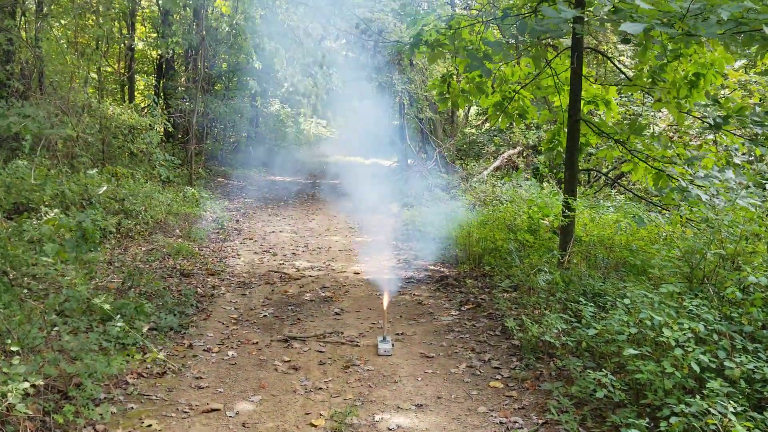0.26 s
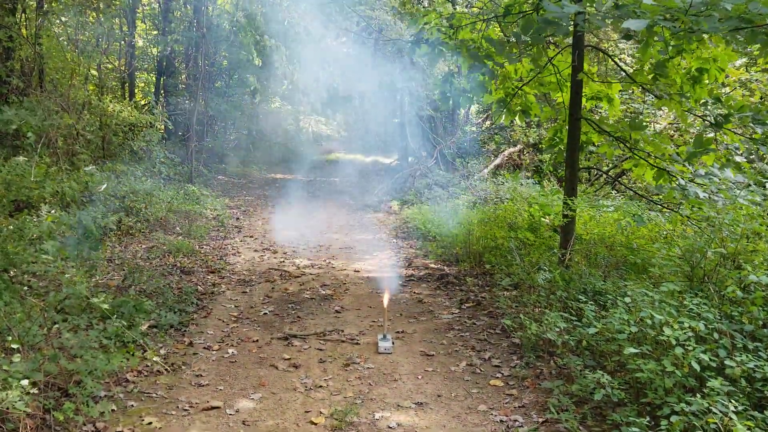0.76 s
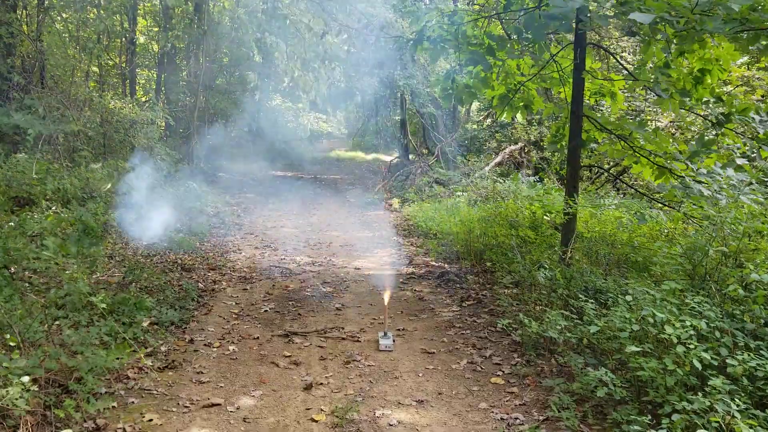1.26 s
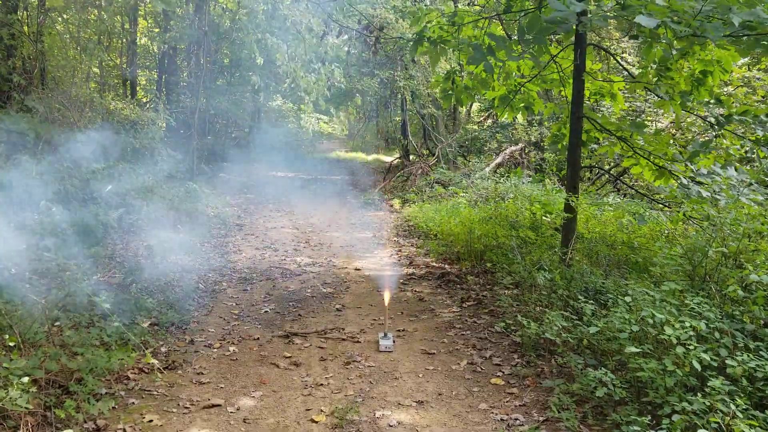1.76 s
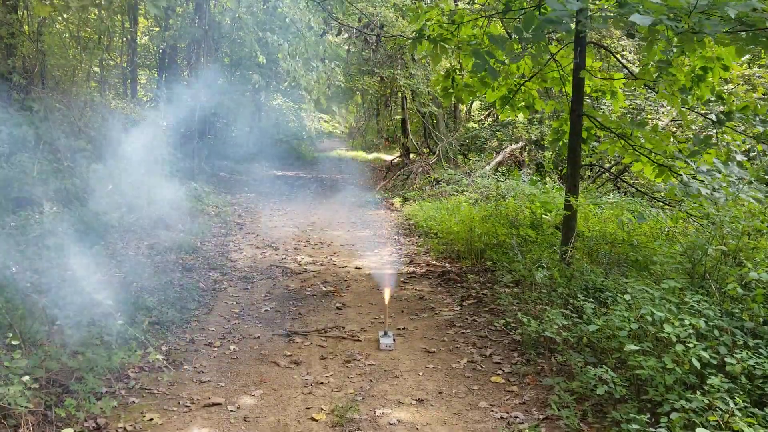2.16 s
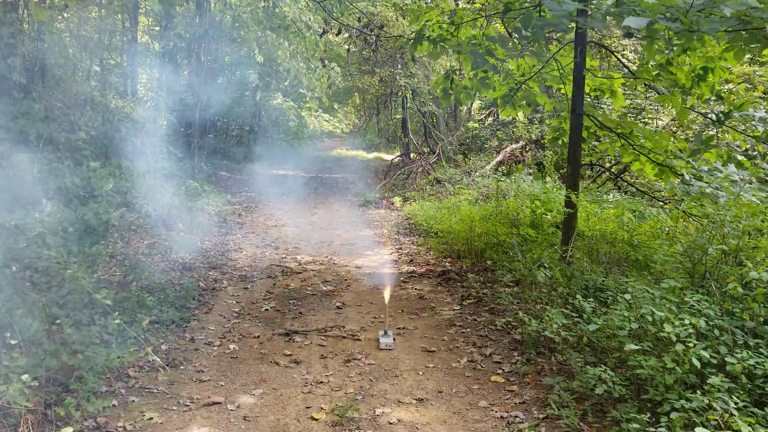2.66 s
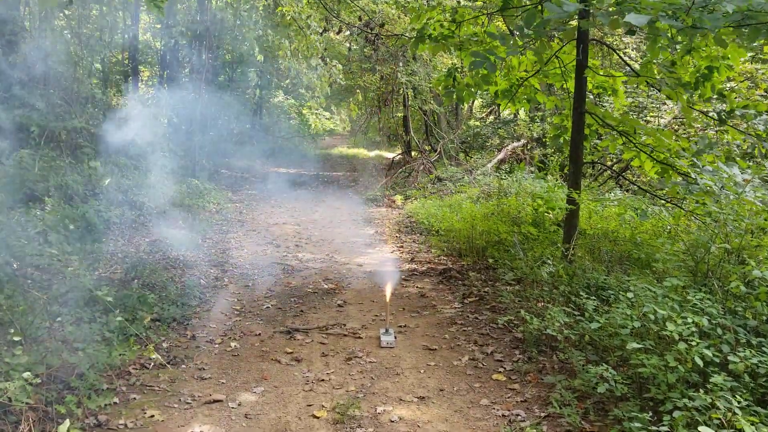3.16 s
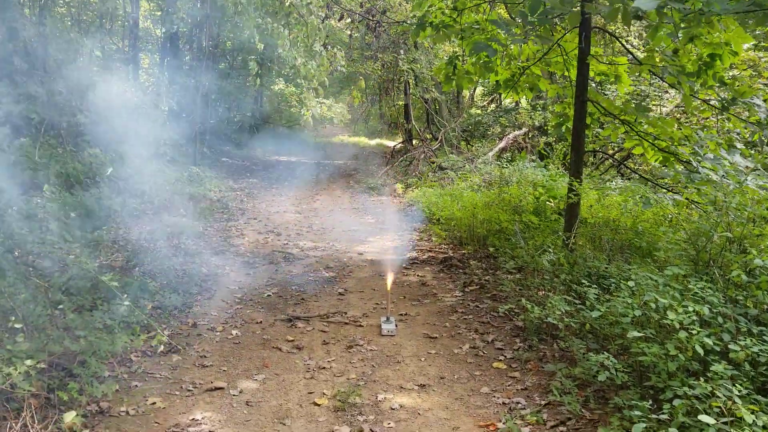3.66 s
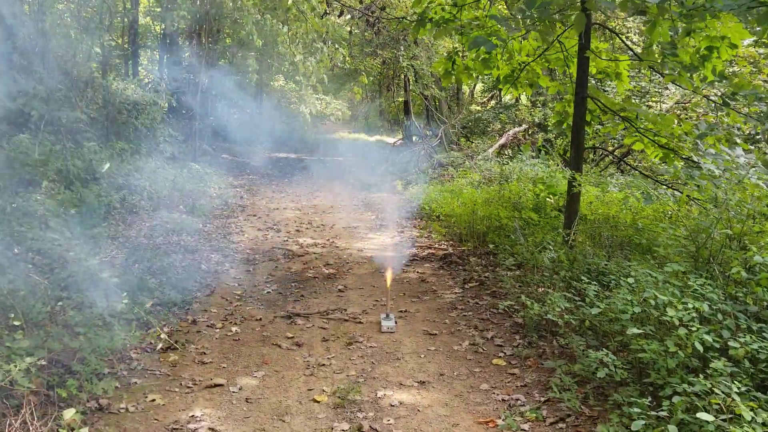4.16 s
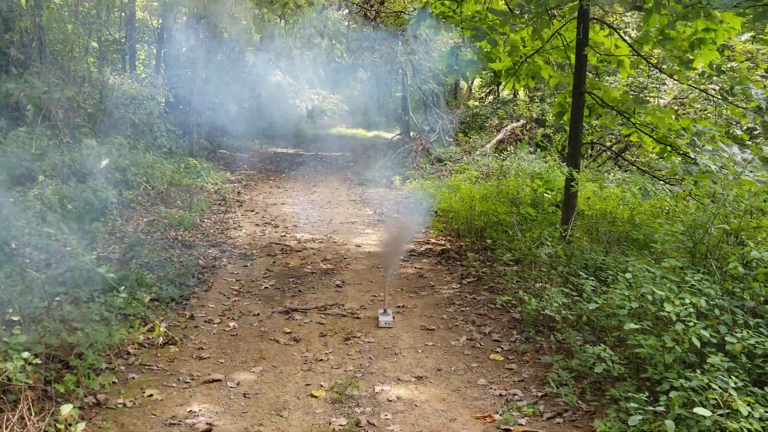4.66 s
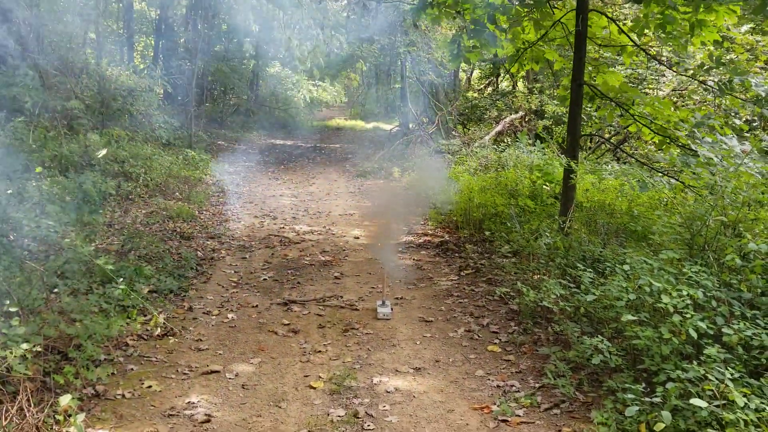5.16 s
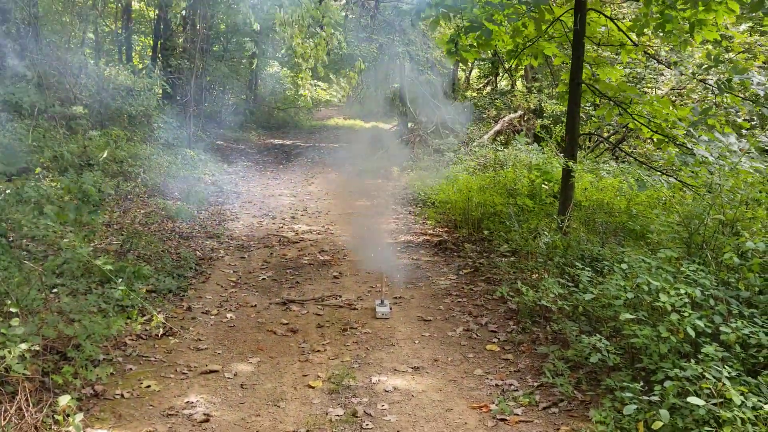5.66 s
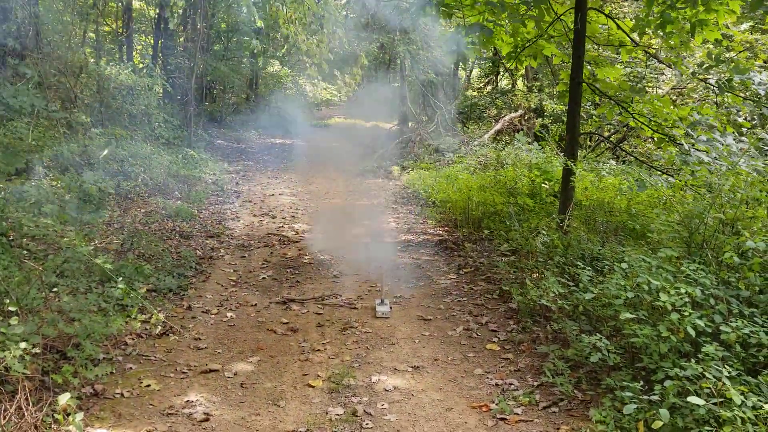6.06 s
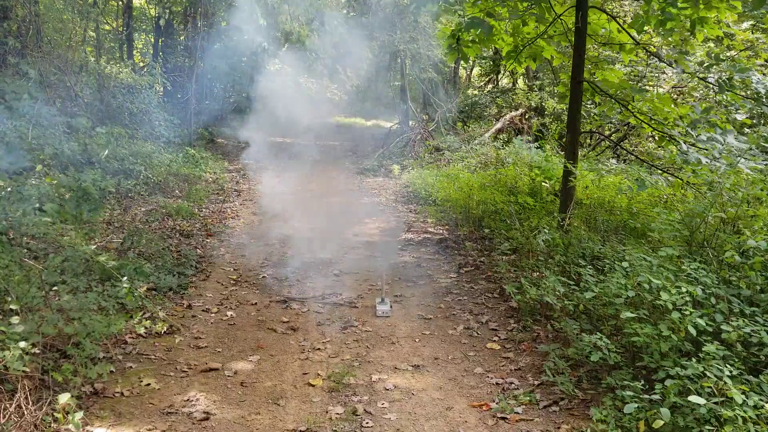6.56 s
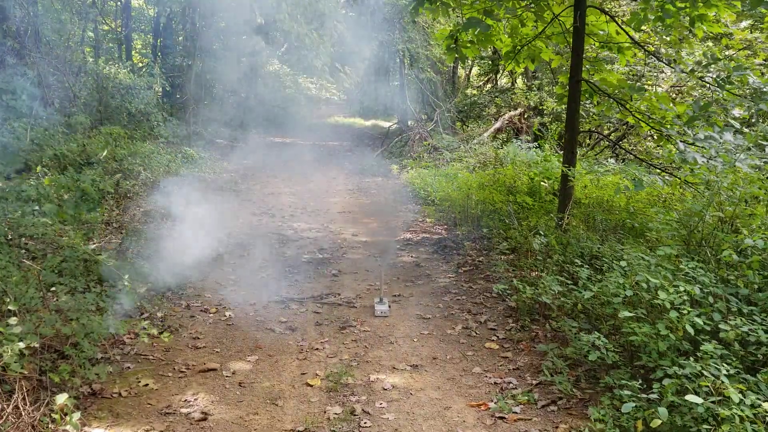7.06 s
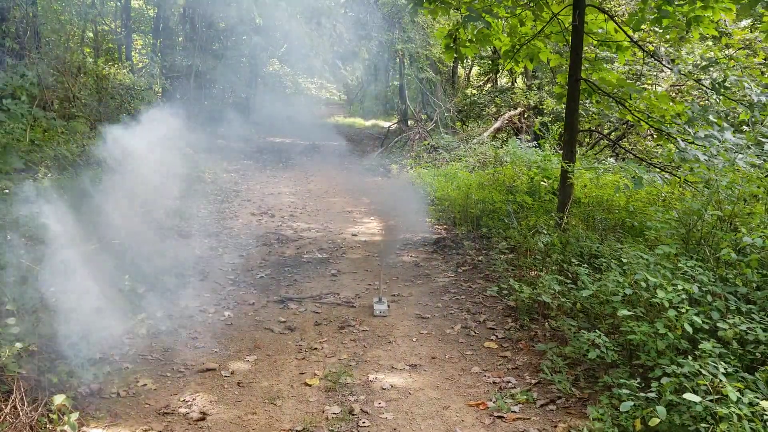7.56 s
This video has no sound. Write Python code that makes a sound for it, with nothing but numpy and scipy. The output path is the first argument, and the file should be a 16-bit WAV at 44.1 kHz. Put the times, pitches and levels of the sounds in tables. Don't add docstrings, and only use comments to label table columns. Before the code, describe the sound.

Close outdoor stereo pickup of a hissing jet on soil, with short ground reflections colouring the noise. It begins very quiet and builds quickly. Low fluttering wind gusts rock the right side, including two big dull thuds, after which the hiss sits lower. The flame cuts to a weaker hiss, holds briefly, then builds again to its strongest rush with airy fizz, and dies away sharply.

```python
import sys
import numpy as np
from scipy import signal
from scipy.fft import rfft, irfft, next_fast_len
from scipy.io import wavfile
from scipy.ndimage import uniform_filter1d

SR = 44100
rng = np.random.default_rng(int(sys.argv[2]) if len(sys.argv) > 2 else 0)


def store_pcm(level_fs):
    pcm = np.round(np.clip(level_fs, -1, 1) * 32767).astype(np.int16)
    wavfile.write(sys.argv[1], SR, np.atleast_2d(pcm).T)


def rack_gain(trim_db):
    fader = np.asarray(trim_db, float)
    return 10 ** (fader / 20)


N = 344229
CLOCK = np.arange(N) / SR


def evened(x):
    return x / np.sqrt(np.mean(abs(x) ** 2) + 1e-20)


def read(points, hz):
    f, value = np.transpose(points)
    return np.interp(np.log(hz + 1), np.log(f + 1), value)


def over_time(points, t):
    return np.interp(t, *np.transpose(points))


def drift(t, top_hz):
    rates = np.geomspace(top_hz / 16, top_hz, num=40)
    return evened(sum(np.sin(2 * np.pi * (f * t + rng.random())) for f in rates))


# frequency in Hz, density in dB per Hz.
BASS_COLOUR = [(12, -50), (20, -35), (42, -1.5), (70, 5.5), (138, -8.5), (189, -14), (230, -30), (300, -60),
               (510, -120)]


def lumpy_bass(level_db, lumpy_db):
    size = next_fast_len(N)
    colour = rack_gain(read(BASS_COLOUR, np.fft.rfftfreq(size, 1 / SR)))
    noise = irfft(rfft(rng.standard_normal(size)) * colour, size)[:N]
    return evened(noise * rack_gain(lumpy_db * drift(CLOCK, 20))) * rack_gain(level_db)


# time in seconds, level in dB.
BREEZE = [(0.0, -79), (1.35, -59), (1.5, -51), (1.85, -51), (2.1, -37), (2.4, -46.5), (2.7, -41),
          (3.0, -38), (3.3, -48), (3.6, -44), (4.5, -69), (5.1, -72), (6.3, -65), (7.81, -62)]


def breeze():
    return lumpy_bass(over_time(BREEZE, CLOCK), lumpy_db=-0.5)


def gusts(rows, flutter_ratio=2.2, rise_share=0.532):
    out, t = np.zeros(N), np.arange(-4410, 8820) / SR
    for s, db, hz, length in rows:
        rise, fall = rise_share * length, (1 - rise_share) * length
        flutter_gain = 1.47 * rack_gain(-6 + 0.31 * db)
        p = rng.random(4)
        slap = .4 * np.exp(-np.maximum(t * 1000 + rise, 0) / 5)
        wobble = .06 * np.sin(2 * np.pi * (22 * t + p[0]))
        turns = np.cumsum(hz * (.95 + slap + wobble)) / SR
        flutter = np.sin(2 * np.pi * (flutter_ratio * turns + p[2])) * np.cos(2 * np.pi * (28 * t + p[3]))
        swing = np.sin(2 * np.pi * (turns + p[1])) + flutter_gain * flutter
        away = abs(t) * 1000 / np.maximum(np.where(t < 0, rise, fall), 2)
        swell = rack_gain(db - 6 * away ** np.where(t < 0, 4.5, 1.9))
        at = round((s - .002) * SR) - 4410
        part = out[at:at + len(t)]
        part += (np.sqrt(2) * swing * swell)[:len(part)]
    return out


# time in seconds, peak in dB, throb in Hz, length in ms.
GUSTS_RIGHT = [(1.447, -36.5, 77.5, 30), (1.491, -41, 68, 20), (1.647, -40, 100.3, 44),
               (1.682, -37, 64.3, 22), (2.077, -37, 98, 23), (2.127, -26.5, 75.4, 21),
               (2.197, -16.5, 84.7, 32.5), (2.63, -6.5, 65.2, 37.7), (2.675, -24.5, 70.5, 33),
               (2.725, -23, 85, 24), (2.745, -24.5, 150.4, 16), (2.764, -25, 72.4, 19),
               (2.867, -27.6, 62.7, 33), (2.938, -24.5, 88.2, 21), (2.998, -27.5, 78.3, 22),
               (3.049, -3, 65.85, 35), (3.081, -13, 58.6, 17), (3.115, -18, 79.4, 15),
               (3.138, -17, 94.2, 21), (3.173, -26, 117, 14), (3.591, -20.5, 89.5, 26),
               (3.671, -43.5, 67, 68), (3.734, -41, 96, 12), (4.23, -44, 75, 30), (4.808, -44.5, 72, 24),
               (6.31, -42, 70, 45), (6.359, -45, 74, 22)]
GUSTS_LEFT = [
    (3.468, -33.5, 81.5, 23),
    (4.145, -45.5, 149, 40),
    (4.352, -43, 80, 36),
]


def wind():
    left = rack_gain(-0.5) * gusts(GUSTS_LEFT)
    return np.array([left, 0.27 * left + gusts(GUSTS_RIGHT) + breeze()])


def membrane(pressure):
    cut = signal.butter(N=4, Wn=50, btype="high", fs=SR, output="sos")
    swing = signal.sosfilt(cut, pressure)
    swing = swing / (1 + (abs(swing) / .93) ** 5) ** (1 / 5)
    slow = signal.butter(N=3, Wn=330, fs=SR, output="sos")
    return signal.sosfiltfilt(slow, swing)


# time in seconds, step in dB, ramp in seconds.
GAIN_STEPS = [
    (2.6, -5, 0.047),
    (3.047, -6.5, .012),
]


def ducking_db(t):
    return sum(db * np.clip((t - s) / ramp, 0, 1) for s, db, ramp in GAIN_STEPS)


# time in seconds, jet level in dB before the gain control.
BURN = [(0.0, -59.5), (1.2, -39.5), (2.0, -32), (2.6, -34), (3.05, -31.5), (3.7, -30.5), (4.3, -31.5),
        (4.495, -38), (4.51, -41.5), (5.13, -40), (5.75, -31.5), (6.8, -26), (7.2, -27), (7.4, -28.5),
        (7.47, -26), (7.62, -33), (7.71, -34.5), (7.81, -43)]


def rumble(fade_db_per_s=22, young_until_s=1.4):
    fade = fade_db_per_s * CLOCK
    trailing = np.maximum.accumulate(over_time(BURN, CLOCK) + fade) - fade
    young_db = -6 * np.clip((young_until_s - CLOCK) / .05, 0, 1)
    return lumpy_bass(-23.5 + trailing + .15 * ducking_db(CLOCK) + young_db, lumpy_db=1.5)


def comb(echoes, hz):
    total = 1 + 0j * hz
    for ms, db, turn, centre, width in echoes:
        late = 2 * np.pi * (hz - centre) * ms / 1000 + turn
        band_db = db - 4.343 * ((hz - centre) / width) ** 2
        total += rack_gain(band_db) * np.exp(-1j * late)
    return np.sqrt(abs(total) ** 2 + .01)


# frequency in Hz, width in Hz, height in dB.
BODY = [(2430, 45, -1), (3226, 43, 2), (3950, 60, -2.5), (5350, 65, 2)]


def shell(hz, scatter_db=1.3):
    ripple = evened(uniform_filter1d(rng.standard_normal(len(hz)), size=9))
    ripple = ripple * read([(1000, 0), (2500, 1)], hz)
    body_db = sum(db * np.exp(-((hz - centre) / width) ** 2) for centre, width, db in BODY)
    return rack_gain(body_db + scatter_db * ripple) / np.sqrt(1 + (110 / (hz + 1)) ** 6)


# frequency in Hz, density in dB per Hz.
JET_LEFT = [(120.0, -8), (250.0, -6.5), (500.0, -11), (900.0, -9.5), (1500.0, -1), (2500.0, -2),
            (4000.0, -10.0), (5500.0, -8.5), (7000.0, -14), (8200.0, -28), (10000.0, -22), (12000.0, -20.5),
            (13500.0, -21.5), (15600.0, -26)]
JET_RIGHT = [(120.0, -13), (250.0, -6), (500.0, -5.5), (900.0, -7.5), (1500.0, -4.5), (2500.0, -4),
             (4000.0, -7), (5500.0, -11), (7000.0, -6.5), (8200.0, -16.5), (10000.0, -16.5), (12000.0, -14),
             (13500.0, -21.5), (15600.0, -31)]
# delay in ms, level in dB, phase turn in rad, centre of the returned band in Hz, its width in Hz.
ECHOES_LEFT = [(0.378, -14.8, -1.75, 12020.0, 3860.0), (0.448, -3.9, -1.11, 3120.0, 550.0),
               (0.566, -23.4, -2.72, 8090.0, 6000.0), (0.948, -27.0, -2.71, 10000.0, 5970.0),
               (1.405, -20.5, -1.52, 4330.0, 990.0), (1.977, -17.6, -2.72, 7910.0, 1110.0),
               (2.085, -12.0, -1.56, 2560.0, 1170.0), (2.206, -1.1, 2.36, 720.0, 250.0),
               (2.248, -23.4, -2.72, 10510.0, 6000.0), (2.476, -13.1, -2.72, 4730.0, 1660.0),
               (3.098, -9.0, -0.21, 790.0, 500.0), (3.275, -21.4, -2.67, 2980.0, 1810.0)]
ECHOES_RIGHT = [(0.438, -4.7, 0.49, 8360.0, 630.0), (0.531, -5.7, -2.6, 830.0, 3300.0),
                (0.828, -20.7, 2.08, 11830.0, 4430.0), (1.28, -15.2, 0.08, 13550.0, 550.0),
                (1.93, -13.8, -0.69, 6430.0, 930.0), (1.964, -10.3, -2.72, 870.0, 1920.0),
                (2.009, -21.9, -2.21, 14010.0, 4500.0), (2.117, -21.7, -3.14, 11070.0, 6000.0),
                (2.271, -12.0, -0.23, 5330.0, 3110.0), (2.507, -16.2, -2.75, 710.0, 5590.0),
                (2.734, -13.4, -2.14, 8290.0, 1070.0), (2.794, -20.5, -2.71, 2720.0, 5640.0)]
ECHOES_AFTERBURN = [(0.416, -11.6, 2.21, 5560.0, 320.0), (0.419, -14.3, 0.32, 8720.0, 1320.0),
                    (1.918, -16.4, -2.91, 9730.0, 4730.0), (2.098, -22.8, 2.49, 11370.0, 5110.0),
                    (2.142, -8.4, -0.08, 1320.0, 320.0), (2.243, -12.3, -2.72, 1360.0, 2660.0),
                    (2.306, -19.5, 2.67, 14780.0, 4640.0), (2.655, -15.8, -2.72, 2860.0, 930.0),
                    (4.046, -14.4, -2.01, 630.0, 250.0)]
# frequency in Hz, lead in rad.
LEAD = [(0, 0), (2300, -.05), (3800, -.9), (4100, -.1), (6300, -1.3), (7700, -1.2), (8600, .2),
        (11000, -.1), (12200, .5), (13000, -.2), (15500, -.3)]


def at_ports(noise, smoke):
    grid, size = np.fft.rfftfreq(8192, 1 / SR), next_fast_len(N)
    fine = np.fft.rfftfreq(size, 1 / SR)
    left = rack_gain(read(JET_LEFT, grid)) * comb(ECHOES_LEFT, grid)
    right = rack_gain(read(JET_RIGHT, grid)) * comb(ECHOES_RIGHT, grid)
    left, right = shell(grid) * np.array([left, right])
    power = np.mean(((left + right) / 2) ** 2 * (grid > 900) * (grid < 2400))
    moved = np.interp(fine, grid, np.sqrt(comb(ECHOES_AFTERBURN, grid)))
    left, right = np.interp(fine, grid, left), np.interp(fine, grid, right)
    lead = np.exp(1j * np.interp(fine, *np.transpose(LEAD)))
    spectrum = rfft(noise, size) * np.array([left * lead, right]) / np.sqrt(power)
    flame = irfft(spectrum / moved, size)[:, :N]
    after = irfft(spectrum * moved, size)[:, :N]
    return flame + smoke * (after - flame)


# frequency in Hz, likeness 0 to 1.
SAME_FLAME = [(150, 0.63), (300, 0.99), (700, 0.95), (1500, 0.98), (2500, 0.88), (4000, 0.86), (6000, 0.8),
              (8500, 0.62), (12000, 0.71), (15000, 0.67)]
SAME_SMOKE = [(150, 0.96), (300, 0.95), (700, 0.94), (1500, 0.97), (2500, 0.83), (4000, 0.76), (6000, 0.68),
              (8500, 0.49), (12000, 0.63), (15000, 0.54)]


def likeness(hz, smoke, depth=0.2):
    both = comb(ECHOES_LEFT, hz) * comb(ECHOES_RIGHT, hz)
    notch = np.minimum(both / uniform_filter1d(both, size=7), 1.2) ** depth
    usual = np.outer(read(SAME_FLAME, np.maximum(hz, 300)), 1 - smoke)
    usual += np.outer(read(SAME_SMOKE, hz), smoke)
    return np.clip(1 - .75 * (1 - usual) / notch[:, None] ** 3, 0, 1)


# centre in Hz, width in Hz, change in dB, start
# in seconds, end in seconds.
DULL = [(8100, 880, -4.5, -1, 1.5), (9500, 4700, -2, 0.3, 1.05), (9050, 1500, -6, 4.46, 4.77),
        (12000, 4000, -1.5, 4.6, 4.7), (5000, 2300, 2.5, 3, 4.47), (9000, 6400, 1.5, 1.3, 2.3),
        (10500, 3000, 2, 3.06, 4.4), (9000, 4000, -2, 2.3, 3.05), (10000, 5000, -2.5, 2.82, 3.05),
        (9000, 4000, -2, 6.9, 7.3), (11400, 5200, 3.5, 7, 7.69), (12000, 4000, 2, 5.34, 5.55)]
# frequency in Hz, change in dB.
AFTERBURN = [(130.0, -7.5), (300.0, -9), (550.0, -1), (800.0, -2.5), (1100.0, -3), (1700.0, 1.5),
             (2300.0, 0), (2750.0, -5.5), (3200.0, 0), (4500.0, -1.9), (6500.0, -0.6), (8500.0, 1),
             (11000.0, 2.5), (15600.0, 5)]


def jet_colour_db(t, hz, smoke):
    thrust_db = uniform_filter1d(over_time(BURN, t), size=30, mode="nearest")
    sinking = np.gradient(thrust_db, t)
    fizz_db = -1.83 + np.clip(0.068 * sinking, -3, 0)
    roar = read([(600, 1), (900, 0)], hz)
    hiss = read([(2200, 0), (2700, 1), (7300, 1), (8200, 0)], hz)
    fizz = read([(7300, 0), (8200, 1)], hz)
    colour_db = (1.25 * roar - 1.37 * hiss)[:, None] + np.outer(fizz, fizz_db)
    for centre, width, db, start, until in DULL:
        band = np.exp(-((hz - centre) / width) ** 2)
        colour_db += db * np.outer(band, (t >= start) & (t < until))
    return colour_db + np.outer(read(AFTERBURN, hz), smoke - .5)


def jet(patchy_db=0.67, flicker_db=0.38, crackle_db=1.0, flame_out_s=4.375):
    frames, hz = N // 128 + 5, np.fft.rfftfreq(512, 1 / SR)
    t = np.arange(frames) * 128 / SR
    smoke = np.clip((t - flame_out_s) / 0.044, 0, 1)
    a, b, c, d, patches = rng.standard_normal((frames, 257, 5)).T
    patches = evened(uniform_filter1d(uniform_filter1d(patches, size=10, axis=0), size=16, axis=1))
    bright = read([(500, 0.094), (8000, 0.81)], hz)
    flicker = flicker_db * drift(t, 60) + crackle_db * drift(t, 140)
    field_db = jet_colour_db(t, hz, smoke) + patchy_db * patches + np.outer(bright, flicker)
    same, first = likeness(hz, smoke), a + 1j * b
    z = np.array([first, same * first + np.sqrt(1 - same ** 2) * (c + 1j * d)])
    white = signal.istft(z[0], nperseg=512, noverlap=384)[1].std()
    noise = signal.istft(z * rack_gain(field_db), nperseg=512, noverlap=384)[1][:, :N] / white
    heard = at_ports(noise, np.interp(CLOCK, t, smoke))
    return heard * rack_gain(over_time(BURN, CLOCK) + ducking_db(CLOCK))


def scene():
    return membrane(rumble() + wind()) + jet()


def roll_off(x):
    return signal.sosfilt(signal.butter(12, 15930, fs=SR, output="sos"), x)


def record(dry):
    held = dry / (1 + (abs(dry) / .99) ** 12) ** (1 / 12)
    return roll_off(held)


dry = scene()
out = record(dry)
store_pcm(out)
```